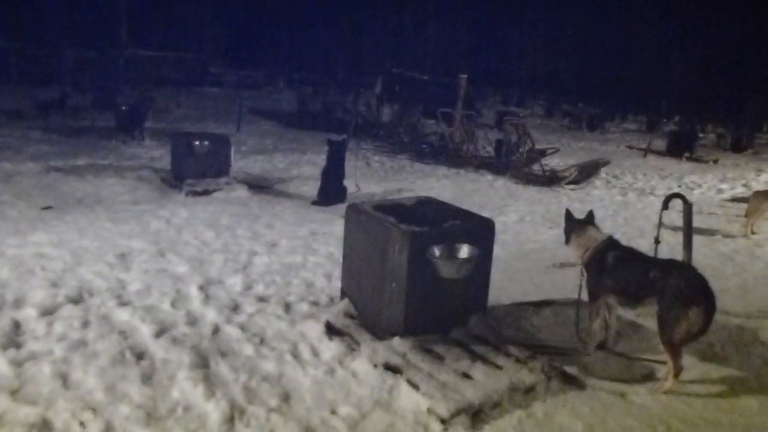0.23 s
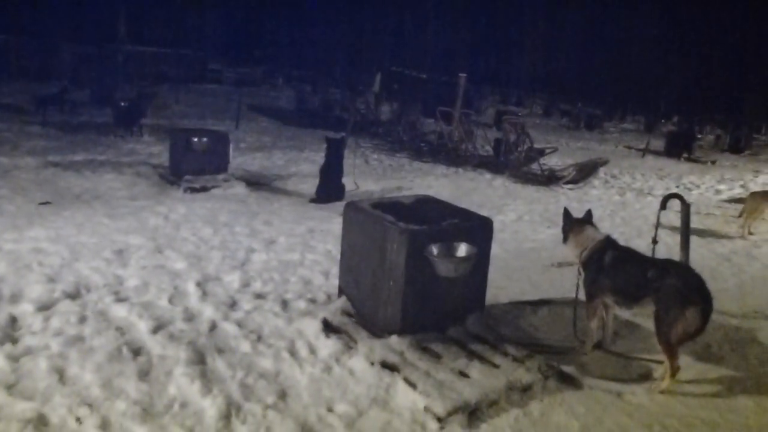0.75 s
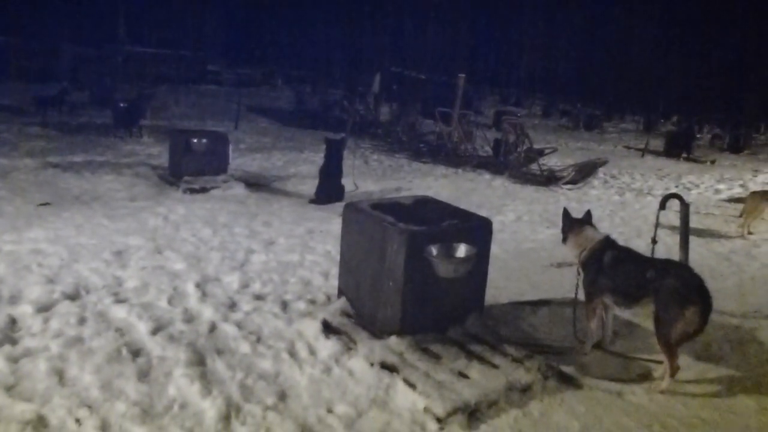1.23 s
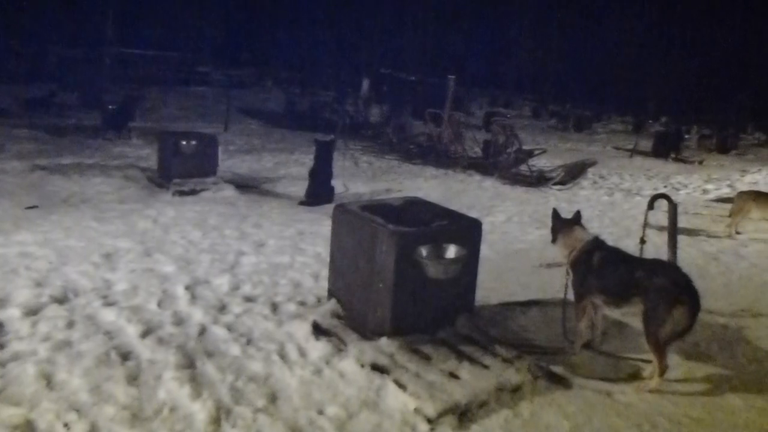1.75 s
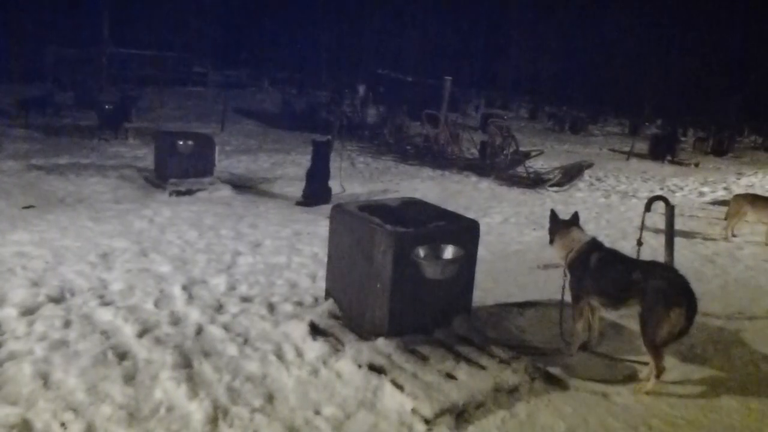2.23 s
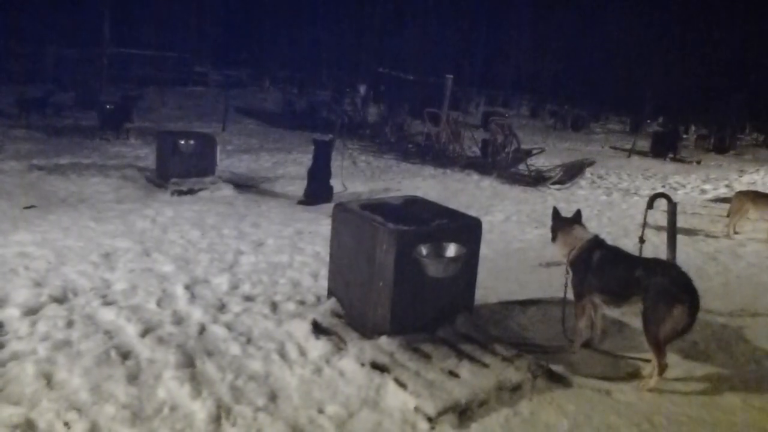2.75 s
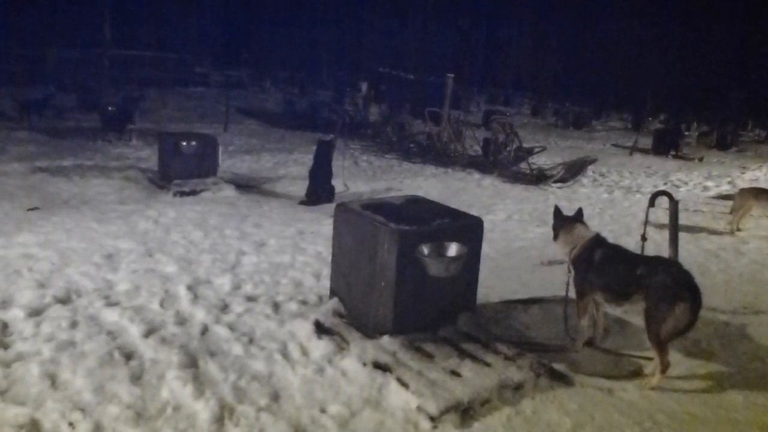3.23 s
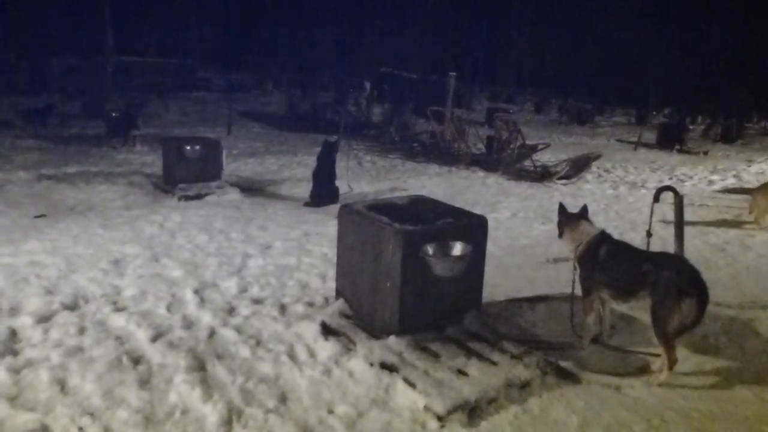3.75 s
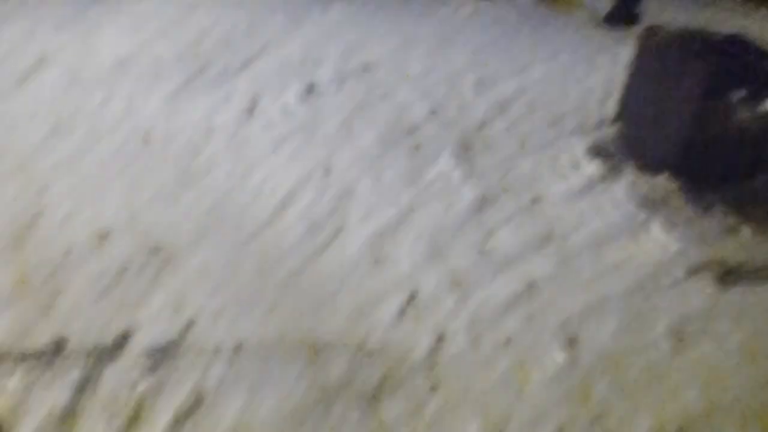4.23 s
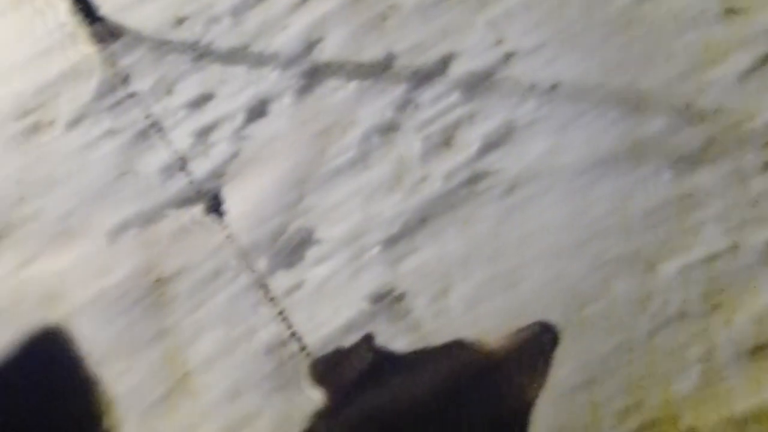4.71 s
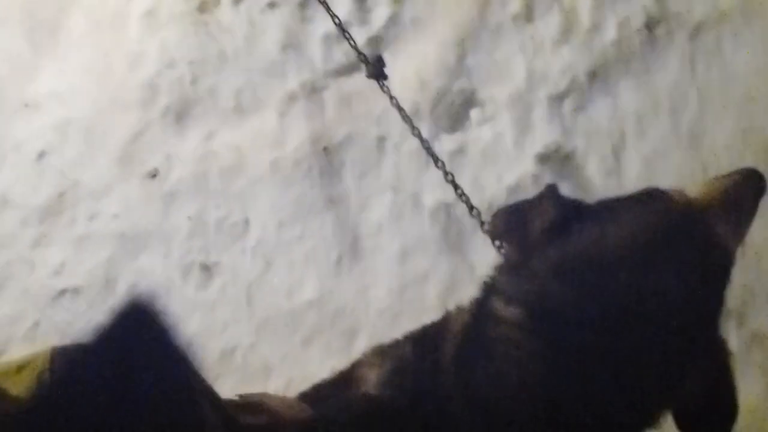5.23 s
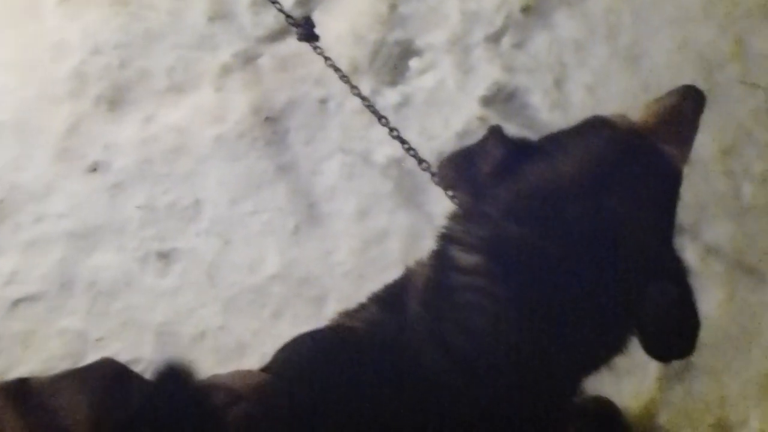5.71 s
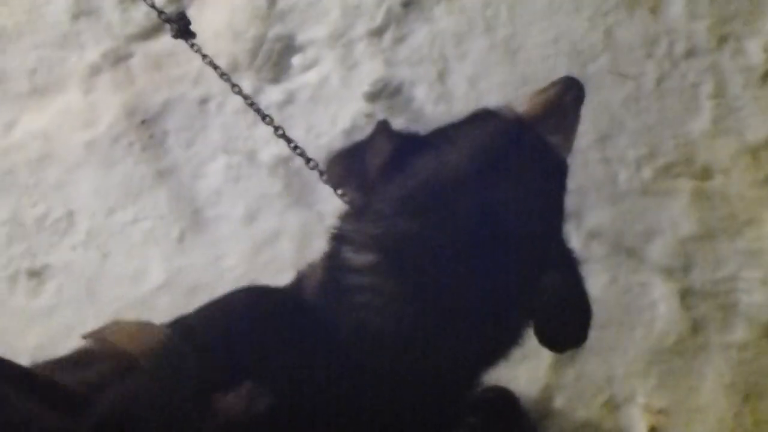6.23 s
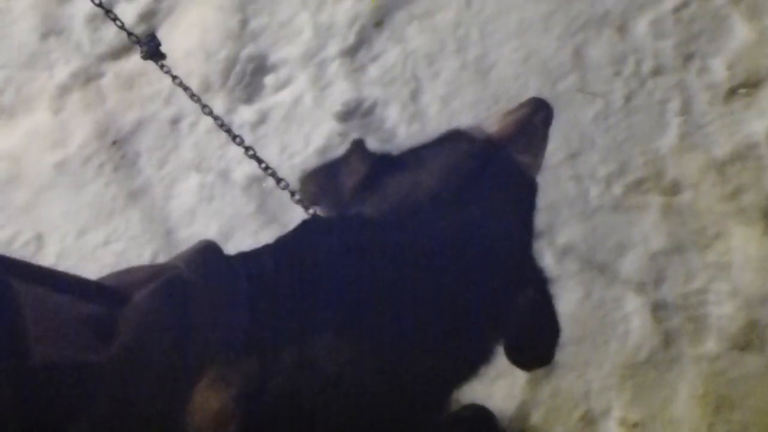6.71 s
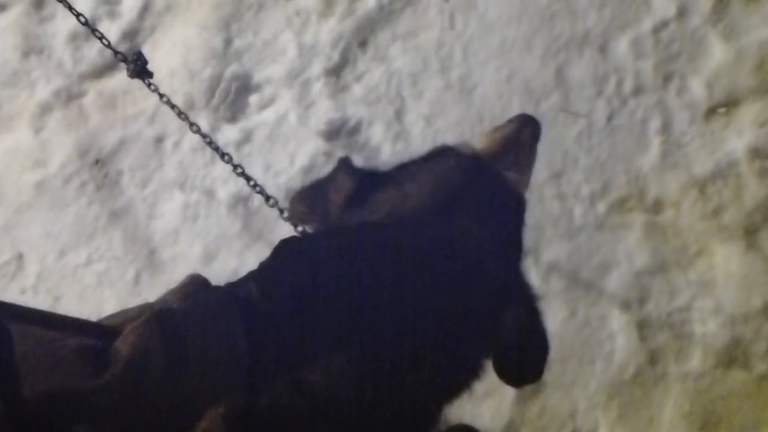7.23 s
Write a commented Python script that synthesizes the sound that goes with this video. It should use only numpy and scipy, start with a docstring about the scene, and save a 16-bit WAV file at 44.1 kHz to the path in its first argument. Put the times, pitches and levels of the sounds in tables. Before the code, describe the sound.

Soft night air, hiss and a faint low hum run throughout in an open dog yard. During the first two seconds a metal bowl clanks lightly farther off, a chain ticks, and a dog gives thin, high nose whines and a soft whimper. At about 2.3 seconds the dog howls loudly, close to the microphone: a wavering, mid-pitched call that breaks between clear and hoarse, then sinks and fades by 3.9. A coat swishes softly from there as the person holding the microphone turns. A shorter, raspy howl comes from 4.7 to 5.4, with a thin whistle around it, followed by a cluster of chain ticks until 5.6. A third howl rises at 5.7, cracks and ends by 6.5. The howls leave a faint echo. Quiet rubbing of cloth and fur and a few link ticks continue until about 7.3 seconds.

```python
"""A sled-dog yard on a snowy night, over a bed of night air, hiss and low hum.
Close to a hand-held camera a dog howls three times, breaking between a clear tone and a hoarse one
as its vocal folds beat evenly or chaotically. It whimpers and whistles thin whines through its nose.
Chain links tick, a metal bowl clanks farther off, and a coat rustles as the camera turns.
Kennels and sleds scatter a faint echo."""
import sys
import numpy as np
from scipy import signal
from scipy.fft import rfft, irfft, next_fast_len
from scipy.io import wavfile
from scipy.ndimage import uniform_filter1d, map_coordinates

SR = 44100
rng = np.random.default_rng(int(sys.argv[2]) if len(sys.argv) > 2 else 0)


def unload_wav(signal):
    """Save mono or channel-first audio to the path in sys.argv[1] as 16-bit WAV at rate SR, clipped to [-1, 1]."""
    wavfile.write(
        sys.argv[1],
        SR,
        np.round(np.clip(np.atleast_2d(signal).T, -1, 1) * 32767).astype(np.int16),
    )


N = 329206

# Tone colours of the air, the hiss, the bright coat and the dull fur.
# Each row: frequency in Hz, relative level in dB.
AIR_SPECTRUM = [(15, -66), (25, -25), (69, -8.5), (102, -16.5), (126, -8), (348, -5), (395, -9.5),
                (439, -8), (672, -7.5), (831, -9.5), (1100, -12.5), (1410, -14.5), (2670, -17.5),
                (4000, -23.5), (5200, -56), (8800, -120)]
HISS_SPECTRUM = [(880, -39), (1500, -2), (2450, -19), (2710, 0), (2930, -4.5), (4990, 1.5), (15800, -9.5)]
SWISH_SPECTRUM = [(1650, -5), (2800, -4), (4680, -4), (7550, -7), (12400, -9.5), (15800, -15)]
RUB_SPECTRUM = [(88, -33), (150, -6), (492, 3.5), (562, -0.5), (1120, -1.5), (1440, -9), (2070, -9.5),
                (2400, -13), (5000, -21.5), (6500, -41), (11000, -120)]
# Stereo image of the noise. Each row: frequency in Hz, left-right likeness from -1 to 1.
STEREO_LIKENESS = [(60, 0.7), (180, 0.896), (550, 0.48), (1650, -0.41), (4970, -0.0077), (15000, 0.096)]
# Echo tail of the yard. Each row: frequency in Hz, seconds to fall 60 dB.
ECHO_DECAY = [(300, 0.34), (1500, 0.99), (6000, 0.91)]
# Bright coat swishes. Each row: start, peak and end in seconds, level in dB, top-octave lift in dB.
COAT_SWISHES = [(3.862, 4.177, 4.9, -50, -4), (4.587, 5.088, 5.55, -54.5, -7), (5.86, 5.99, 6.1, -52.5, 4),
                (6.337, 6.586, 7.1, -50, -1.5)]
# Dull rubs of cloth and fur. Each row: start, peak and end in seconds, level in dB.
COAT_RUBS = [(3.8, 4.508, 4.79, -45), (5.4, 5.5, 5.97, -44), (6.376, 6.444, 6.75, -40),
             (6.703, 7.003, 7.3, -48.5)]
# Ring of the bowl. Each row: frequency in Hz, level in dB, seconds to fall 60 dB.
BOWL_MODES = [(1615, 13, 0.1), (2320, -0.5, 0.066), (2442, 0, 0.031), (2750, -19, .15), (3035, 3, 0.1),
              (3240, 0, 0.2), (5170, -9, .05)]
# Knocks on the bowl. Each row: start in seconds, level in dB, ring in dB, rattle decay in seconds.
BOWL_CLANKS = [(0.112, -58, -19, 0.027), (0.492, -48, -3, 0.0066), (1.15, -50.5, -13, 0.025),
               (1.29, -44, 8, 0.021), (1.315, -44.5, -8, 0.033), (1.561, -48, -26, 0.048),
               (1.612, -48, -28, 0.06), (1.656, -48.5, -38, 0.076), (1.896, -45, -21, 0.029),
               (1.924, -42.5, -15, 0.0416), (1.972, -49.5, -14.5, 0.14)]
# Link contacts. Each row: start in seconds, level in dB, relative thump in dB, leftward pan in dB.
CHAIN_TICKS = [(0.2664, -38, -5, -1), (0.4943, -45.5, -2, -9), (2.2484, -44, 3.5, -1),
               (3.5119, -47, -6, -5), (3.6004, -40.5, -8, 4), (4.2657, -37.5, 5.5, -5),
               (4.5386, -33, 1, -6.5), (5.3284, -39.5, -10, 6.5), (5.3657, -35, 8, 1),
               (5.3826, -37, 12, 11), (5.401, -33, 6, 5), (5.437, -32.5, 9, -10.5), (5.462, -33, 8, -1.5),
               (5.6006, -29.5, 6.5, 11), (5.6245, -46, 1, 0.5), (5.6424, -46, 14, 11),
               (6.2746, -42.5, -9, 7), (6.4594, -40, -5, 8), (6.549, -69, -8, 7), (6.756, -52, -12, 8),
               (6.9292, -54, 17, 6), (7.01, -52, 22, 3.5), (7.0674, -53.5, 19, 5)]
# Nose whistles, and a ringing overtone of the first howl.
# Each row: start, peak and end in seconds, level in dB, pitch at start, peak and end in Hz.
THIN_TONES = [(.39, .432, 0.48, -46.5, 4760, 4685, 4850), (.84, 1.26, 1.326, -50, 5386, 5740, 5680),
              (1.62, 1.64, 1.61, -52, 5650, 5760, 5800), (2.03, 2.19, 2.35, -46.5, 5560, 5720, 5380),
              (2.85, 2.865, 2.91, -41.5, 2627, 2630, 2640), (2.93, 2.95, 3.04, -59, 2590, 2634, 2650),
              (3.88, 3.95, 4.02, -62, 6069, 6140, 6070), (4.65, 4.85, 5.0, -54, 5004, 5660, 5615),
              (4.95, 5.25, 5.59, -52, 5665, 5678, 5382)]
# Low falling tones: a soft whimper and the sinking tails of howls. Each row: as in THIN_TONES.
FALLING_TONES = [(1.29, 1.34, 1.42, -51, 609, 604, 400), (1.43, 1.5, 1.53, -43, 380, 274.6, 237),
                 (5.39, 5.44, 5.58, -53, 205, 160, 98.4), (5.46, 5.55, 5.7, -51, 232.7, 186.2, 173.5),
                 (6.38, 6.45, 6.52, -52.5, 300.7, 190.5, 120)]
# Tone colours of the hoarse throat and the mouth's upper resonances.
# Each row: frequency in Hz, relative level in dB.
THROAT_SPECTRUM = [(150, -79), (250, -24), (363, -15.5), (410, -2), (476, 2), (702, 1.5), (863, 6.5),
                   (1040, 2.5), (1300, 1), (1540, -63), (1800, -18), (2340, -59), (3960, -120)]
MOUTH_SPECTRUM = [(820, -12.5), (1400, -5.5), (1530, -10), (1750, -15.5), (1970, -15), (2250, -10.5),
                  (2730, -30.5), (3100, -33.5), (3900, -32.5), (4250, -34), (4610, -41.5), (4900, -31.5),
                  (5470, -28), (6400, -33.5), (7100, -37.5), (9000, -48), (11700, -64), (19800, -120)]
# Melody, one list per howl. Each row: time in seconds, pitch in Hz.
HOWL_PITCH = [
    [(2.34, 258.4), (2.386, 438.2), (2.476, 477), (2.535, 449.7), (2.55, 398.8), (2.604, 418.2),
     (2.67, 475.7), (2.72, 430.5), (2.83, 432), (2.85, 445.8), (2.892, 443.7), (2.97, 390), (3.04, 425.8),
     (3.12, 443.6), (3.21, 395.3), (3.27, 432.4), (3.374, 429.3), (3.41, 393.4), (3.45, 375.7),
     (3.598, 369.6), (3.648, 358.6), (3.722, 248.9), (3.85, 161.9)],
    [(4.74, 342.4), (4.78, 412.3), (4.83, 453.7), (4.845, 410.2), (4.908, 448.8), (4.974, 409.4),
     (5.055, 432), (5.075, 484.4), (5.138, 492.8), (5.195, 426.3), (5.21, 385.2), (5.302, 383), (5.44, 336)],
    [(5.68, 172.6), (5.804, 390.8), (5.845, 454.2), (5.909, 496.4), (5.95, 505.3), (6.005, 504),
     (6.025, 448), (6.1, 469.8), (6.196, 512), (6.2, 240.5), (6.3, 292.3), (6.31, 442.6), (6.45, 490)],
]
# Effort and jaw, one list per howl.
# Each row: time in seconds, level in dB, the fundamental's share in dB, mouth opening from 0 to 1.
HOWL_EFFORT = [
    [(2.345, -36, -2, .4), (2.375, -16.5, -6.5, 0.74), (2.436, -11, 1.5, 0.39), (2.49, -16.5, -1, 0.64),
     (2.54, -29.5, -1.5, 0.52), (2.608, -20, -8, 0.27), (2.662, -15, -0.5, 0.46), (2.704, -20.5, 3, 0.6),
     (2.726, -19, -21, 0.34), (2.806, -15, -10, 0.47), (2.874, -15, -20, 0.47), (2.91, -22.5, -22, 0.4),
     (2.996, -29, -10.5, 0.26), (3.08, -20, 1, 0.35), (3.198, -25, -6, .4), (3.264, -21, -6, 0),
     (3.374, -23, 0.5, 0.34), (3.428, -26, -9.5, 0), (3.56, -30.5, -8, 0.03), (3.64, -25.5, -13.5, 0.01),
     (3.69, -39, -8.5, 0), (3.85, -55.5, -2, 0.06)],
    [(4.752, -30, -9, 0.57), (4.766, -21, -0.5, 0.81), (4.784, -14.5, -10.5, 0.94), (4.828, -13, 0.5, 0.48),
     (4.862, -16.5, -11.5, 0.61), (4.924, -24.5, -6, 0.57), (4.982, -21.5, -10.5, 0.26),
     (5.038, -15, -13.5, 0.58), (5.104, -20, -0.5, 0.76), (5.166, -21.5, -3, 0.89), (5.216, -28, -5, 0.47),
     (5.306, -29.5, -7, 0.14), (5.342, -29, -11.5, 0.16), (5.44, -42, -1.5, 0.44)],
    [(5.7, -52, 0, .5), (5.77, -38.5, -1.5, 0.62), (5.794, -23.5, -8, 0.34), (5.834, -11.5, -5, 0.86),
     (5.872, -18, -6, .7), (5.93, -18, -6, .5), (5.976, -16, -1.5, 0.97), (6.016, -17.5, -1.5, 0.89),
     (6.104, -15, -17.5, 0.63), (6.178, -27.5, -1, .6), (6.205, -31, -16, .4), (6.254, -36, -14, 0.02),
     (6.29, -24.5, -19, 0.26), (6.318, -24, -0.5, 0.57), (6.376, -30, -7, 0.52), (6.45, -48, -1, 0.43)],
]
# Brightness, one list per howl. Each row: time in seconds, treble level in dB.
HOWL_TREBLE = [
    [(2.345, -66), (2.367, -39), (2.391, -31.5), (2.399, -35), (2.465, -34.5), (2.513, -42), (2.829, -45.5),
     (2.845, -37), (2.903, -43.5), (2.935, -53.5), (3.635, -54), (3.75, -75)],
    [(4.75, -44), (4.78, -31), (4.834, -36.5), (4.886, -36), (4.922, -44), (5.108, -30.5), (5.168, -47),
     (5.178, -42), (5.234, -51), (5.404, -53), (5.414, -57), (5.44, -66)],
    [(5.76, -55.5), (5.83, -34), (5.956, -32.5), (5.962, -32), (6.0, -44), (6.01, -37), (6.088, -31.5),
     (6.234, -47.5), (6.342, -39.5), (6.356, -45), (6.368, -43), (6.45, -57)],
]
# Voice breaks, each held until the next. Each row: start in seconds, relative hoarse level in dB.
VOICE_BREAKS = [(2.3, -2.5), (2.399, -10), (2.54, -18.5), (2.672, -3), (2.721, -8.5), (2.84, -19),
                (2.97, -5), (3.25, -23), (3.29, -4.5), (3.41, -21.5), (4.7, -6), (4.775, -14.5),
                (4.83, -7.5), (5.03, -7), (5.2, -7), (5.6, -13), (5.847, -3.5), (5.95, -19), (6.01, -6.5),
                (6.2, -6.5), (6.3, -7)]
# Rasp of the voice. Each entry: roughness from 0 to 1 after the matching break.
BREAK_ROUGHNESS = [.7, .5, .05, 1, .45, .05, .6, .05, .5, .07, .7, .12, .5, .55, .4, .08, .9, .12, .55, .35,
                   .6]
# The dog's direction as the camera turns. Each row: time in seconds, leftward pan in dB.
DOG_PAN = [(0.0, 0.0), (1.93, 1), (2.12, 5), (3.47, 4), (5.09, -2.5), (7.04, 0), (7.46, -0.5)]

HUM_HZ, HUM_DB = 100, -61.5
JAW_SHUT_HZ, JAW_OPEN_HZ, JAW_WIDTH_HZ, JAW_SKIRT_DB = 741, 1378, 234, 34  # lower vowel resonance
LIPS_SHUT_HZ, LIPS_OPEN_HZ, LIPS_WIDTH_HZ, LIPS_DB = 1840, 2327, 270, -4  # upper vowel resonance
CLEAR_LOSS_DB = 7  # the low harmonics duck this far at full roughness
TOP_HZ = 15850


def amp(db):
    """Decibels as a gain."""
    return 10 ** (np.asarray(db) / 20)


def unit(x):
    """Scale to an rms of 1."""
    return x / np.sqrt(np.mean(x ** 2) + 1e-20)


def along(points, hz):
    """Read (Hz, value) points on a log frequency axis."""
    knots_hz, values = np.transpose(points)
    return np.interp(np.log(hz + 1), np.log(knots_hz + 1), values)


def curves(rows):
    """One automation curve for each column after the time, smoothed over 14 ms."""
    times, *columns = np.transpose(rows)
    return [uniform_filter1d(np.interp(np.arange(N) / SR, times, c), size=600) for c in columns]


def wobble(rate):
    """A smooth random curve, rate knots a second."""
    coarse = np.arange(0, N + 16, 16)
    smooth = map_coordinates(rng.standard_normal(int(N * rate / SR) + 4), [coarse * rate / SR])
    return np.interp(np.arange(N), coarse, smooth)


def swell(start, peak, end, db, edge_db, fade):
    """An envelope that peaks at db, sits edge_db lower at both ends and fades beyond them."""
    gain = np.zeros(N)
    span = slice(max(int((start - fade) * SR), 0), int((end + fade) * SR))
    t = np.arange(N)[span] / SR
    gate = np.clip(np.minimum(t - start, end - t) / fade + 1, 0, 1)
    gain[span] = gate * amp(db - edge_db * np.interp(t, [start, peak, end], [1, 0, 1]))
    return gain


def above(edge_hz):
    """A steep high-pass response."""
    return lambda hz: 1 / (1 + (edge_hz / (hz + 1)) ** 8)


def filtered(x, response):
    """Equalise x with a response given as a function of Hz."""
    size = next_fast_len(N + SR // 2)
    return irfft(rfft(x, size) * response(np.fft.rfftfreq(size, 1 / SR)), size)[..., :N]


def coloured(x, spectrum):
    """Give x a tone colour, at an rms of 1."""
    return unit(filtered(x, lambda hz: amp(along(spectrum, hz))))


def rush(spectrum, patchy_db):
    """Coloured stereo noise of rms 1 with patches of random gain."""
    bins = signal.stft(rng.standard_normal((2, N)), nperseg=512)[2]
    patches = uniform_filter1d(uniform_filter1d(rng.standard_normal(bins.shape[1:]), 6, 0), 10, 1)
    pair = signal.istft(bins * amp(patchy_db * unit(patches)), nperseg=512)[1][:, :N]
    width = lambda hz: np.arccos(np.clip(along(STEREO_LIKENESS, hz), -1, 1)) / 2
    mid, side = filtered(pair, lambda hz: amp(along(spectrum, hz)) * [np.cos(width(hz)), np.sin(width(hz))])
    return unit(np.array([mid + side, mid - side]))


def panned(x, db):
    """Set the left channel db louder than the right."""
    return x * amp(np.array([db / 2, -db / 2]).reshape(2, -1))


def placed(x, pan_db):
    """The farther microphone hears the dog weaker and a little later."""
    n = np.arange(N)
    lag = 0.23 * pan_db - .6  # samples
    high = filtered(x, lambda hz: hz ** 2 / (hz ** 2 + 700 ** 2))  # lows bend round the camera body
    left, right = x - high + panned(high, pan_db)
    return np.array([np.interp(n + lag, n, left), np.interp(n - lag, n, right)])


def yard_bed():
    """Gently heaving night air, steady microphone hiss and a wavering low hum."""
    air = amp(-50.5 + 0.89 * wobble(6)) * rush(AIR_SPECTRUM, patchy_db=.5)
    hiss = amp(-55) * filtered(rush(HISS_SPECTRUM, patchy_db=.7), above(1000))
    hum_gain = np.sqrt(2) * amp(HUM_DB + 1.3 * wobble(16))
    hum = hum_gain * np.sin(2 * np.pi * HUM_HZ * np.arange(N) / SR + .5 * wobble(30))
    return air + hiss + hum


def echoes(x):
    """Kennels and sleds scatter the sound back; each frequency dies at its own speed."""
    hz, t, bins = signal.stft(rng.standard_normal((2, SR // 2)), SR, nperseg=256)
    tail = signal.istft(bins * amp(-60 * t / along(ECHO_DECAY, hz)[:, None]), SR, nperseg=256)[1]
    delayed = np.pad(x, (700, 0))  # 16 ms pre-delay
    return signal.fftconvolve(delayed[None], tail / np.linalg.norm(tail[0]), axes=1)[:, :N]


def coat():
    """Fibres slip in small grains: bright swishes of cloth and dull rubs of cloth and fur."""
    grit = amp(1.2 * wobble(9) + 2 * wobble(300))
    cloth = unit(grit * filtered(rush(SWISH_SPECTRUM, patchy_db=1.5), above(1400)))
    top = filtered(cloth, above(8100))
    swish = sum(swell(*row, edge_db=11, fade=0.124) * (cloth + (amp(crisp_db) - 1) * top)
                for *row, crisp_db in COAT_SWISHES)
    narrow_noise = rng.standard_normal(N) + 0.17 * rng.standard_normal((2, N))
    rub = coloured(grit * narrow_noise, RUB_SPECTRUM)
    rub *= sum(swell(*row, edge_db=7, fade=0.087) for row in COAT_RUBS)
    return panned(amp(7) * swish, 2.5) + panned(rub, 1)


def bowl():
    """A short rattle of contacts keeps feeding the modes of the metal bowl."""
    out, t = np.zeros(N + SR), np.arange(SR // 2) / SR
    for start, db, ring_db, rattle_s in BOWL_CLANKS:
        ring = np.zeros(len(t))
        for hz, mode_db, t60 in BOWL_MODES:
            share = 1 if hz < 2000 else 0.48 if hz > 2900 else 0  # how far this mode follows ring_db
            stray_db, detune_db = rng.normal(0, [2, .08])
            decay = amp(mode_db + share * ring_db + stray_db - 60 * t / t60)
            ring += decay * np.sin(2 * np.pi * hz * amp(detune_db) * t)
        rattle = rng.standard_normal(len(t)) * np.exp(-t / max(rattle_s, .003))
        attack = 12 * np.diff(rattle, prepend=0) * amp(-60 * t / 0.012)
        clank = signal.fftconvolve(ring, rattle)[:len(t)] + attack
        out[round(start * SR):][:len(t)] += amp(db + 5.5) * clank / np.abs(clank).max()
    return out[:N]


def chain():
    """Each link contact is a short crack over a dull thump."""
    cracks, thumps = np.zeros((2, 2, N + SR))
    t = np.arange(SR // 30) / SR
    for start, db, thump_db, pan_db in CHAIN_TICKS:
        noise = rng.standard_normal(len(t)) + rng.standard_normal((2, len(t)))
        crack = amp(db + 0.5 - 60 * t / 0.016) * noise
        tones = sum(gain * np.sin(2 * np.pi * hz * amp(rng.normal(0, 1)) * t)
                    for hz, gain in [(500, 0.96), (900, 0.624), (1400, 0.21)])
        cracks[:, round(start * SR):][:, :len(t)] += panned(crack, pan_db)
        thumps[:, round(start * SR):][:, :len(t)] += amp(db + thump_db - 60 * t / 0.019) * tones
    links = lambda hz: (1j * hz * 9500 / (5500 ** 2 - hz * hz + 1j * hz * 9500)) ** 2  # broad resonance
    return filtered(cracks[:, :N], links) + filtered(thumps[:, :N], above(182))


def gliding_tones(rows, waver, flutter_db, edge_db, breath):
    """Each row is one tone that glides, swells, wavers and carries a breathy edge."""
    out = np.zeros(N)
    drift = 1 + waver * wobble(40)
    flutter = amp(flutter_db * wobble(30))
    blur = breath * wobble(400)
    for start, peak, end, db, start_hz, peak_hz, end_hz in rows:
        gain = swell(start, peak, end, db, edge_db, fade=.02)
        n = np.flatnonzero(gain)
        away = np.interp(n / SR, [start, peak, end], [1, 0, 1]) ** 1.4  # the pitch lingers near peak_hz
        glide = peak_hz + (np.where(n / SR < peak, start_hz, end_hz) - peak_hz) * away
        out[n] += gain[n] * np.sin(2 * np.pi * np.cumsum(glide * drift[n]) / SR + blur[n])
    return np.sqrt(2) * flutter * out


def hoarse_breath(phase, level_db, treble_db, hoarse_db):
    """Chaotically beating folds let air out in one uneven puff per cycle, in lumps of a few cycles."""
    puffs = (1 + np.cos(phase)) * amp(1.5 * wobble(85)) * rng.standard_normal((2, N))
    body = coloured(puffs[0], THROAT_SPECTRUM)
    rasp = filtered(coloured(puffs[1], MOUTH_SPECTRUM), above(900))
    rasp_db = treble_db + 0.48 * hoarse_db + 8.5 + 2.15 * wobble(45)
    return amp(level_db + hoarse_db) * body + amp(rasp_db) * rasp


def lip_harmonics(pitch, phase, shake, opening):
    """Harmonics 4-16 pass the mouth's upper resonances and one that rises as the lips open."""
    lips_hz = LIPS_SHUT_HZ + (LIPS_OPEN_HZ - LIPS_SHUT_HZ) * opening
    out = np.zeros(N)
    for k in range(4, 17):
        hz = k * pitch
        lips = amp(LIPS_DB) / (1 + ((hz - lips_hz) / LIPS_WIDTH_HZ) ** 2) ** 2
        mouth = amp(along(MOUTH_SPECTRUM, hz) + 8) * above(3000)(hz)
        out += (lips + mouth) * amp(2.5 * wobble(25)) * np.sin(k * phase + 2.2 * shake)
    return out


def jaw_harmonics(pitch, phase, shake, opening, fundamental_db, rough):
    """Harmonics 2-5 share what the fundamental leaves, by their distance from the jaw resonance."""
    jaw_hz = JAW_SHUT_HZ + (JAW_OPEN_HZ - JAW_SHUT_HZ) * opening
    distance = np.array([(k * pitch - jaw_hz) / JAW_WIDTH_HZ for k in range(2, 6)])
    weights = amp(-JAW_SKIRT_DB * np.log10(1 + distance ** 2))
    fundamental = amp(np.minimum(fundamental_db, -.3))
    overtones = weights * np.sqrt((1 - fundamental ** 2) / np.sum(weights ** 2, axis=0))
    # uneven cycles blur the overtones more than the fundamental
    return sum(gain * amp(4 * rough * wobble(70)) * np.sin(k * phase + (k - .7) * shake)
               for k, gain in enumerate([fundamental, *overtones], 1))


def howl():
    """The vocal folds sing a harmonic tone that shakes in rough stretches and breaks into hoarseness."""
    pitch, = curves(np.vstack(HOWL_PITCH))
    level_db, fundamental_db, opening = curves(np.vstack(HOWL_EFFORT))
    treble_db, = curves(np.vstack(HOWL_TREBLE))
    starts, break_db = np.transpose(VOICE_BREAKS)
    section = np.clip(np.searchsorted(starts * SR, np.arange(N)) - 1, 0, None)
    rough, hoarse_db = uniform_filter1d(np.array([BREAK_ROUGHNESS, break_db])[:, section], size=600)
    jitter = 1 + .002 * wobble(30) + .015 * rough * wobble(60)
    phase = 2 * np.pi * np.cumsum(pitch * jitter) / SR
    shake = 1.3 * rough * wobble(110)  # radians
    body = jaw_harmonics(pitch, phase, shake, opening, fundamental_db, rough)
    edge = lip_harmonics(pitch, phase, shake, opening)
    clear = amp(level_db - CLEAR_LOSS_DB * rough) * body + amp(treble_db) * edge
    hoarse = hoarse_breath(phase, level_db, treble_db, hoarse_db)
    gate = sum(swell(rows[0][0], rows[1][0], rows[-1][0], 0, 0, fade=.004) for rows in HOWL_EFFORT)
    return gate * (np.sqrt(2) * clear + hoarse)


def scene():
    """The dog up front; bowl, echo, chain, coat and the yard's bed behind it."""
    voice = howl() + gliding_tones(FALLING_TONES, waver=0.018, flutter_db=5.5, edge_db=7, breath=.1)
    thin = gliding_tones(THIN_TONES, waver=.0035, flutter_db=2.4, edge_db=7.5, breath=.28)
    clank = bowl()
    direct = placed(voice, curves(DOG_PAN)[0]) + panned(thin, -8) + panned(clank, -2)
    echo = amp(-17.5) * echoes(voice + .3 * thin + clank)
    return direct + echo + chain() + coat() + yard_bed()


def record(dry):
    """The camera keeps nothing above its band limit."""
    return filtered(dry, lambda hz: hz < TOP_HZ)


dry = scene()
out = record(dry)
unload_wav(out)
```